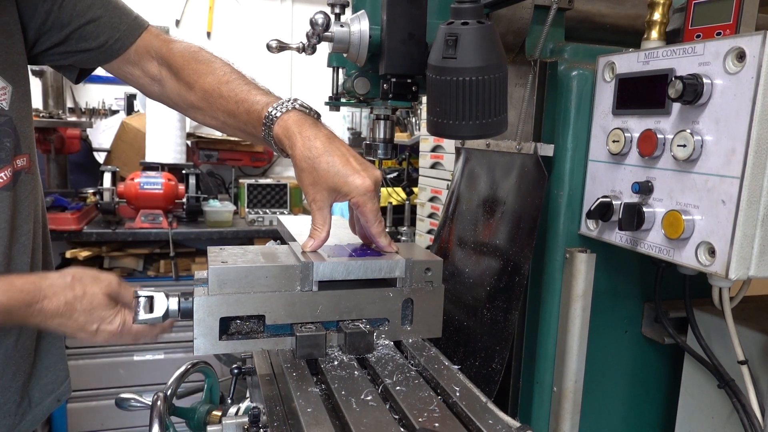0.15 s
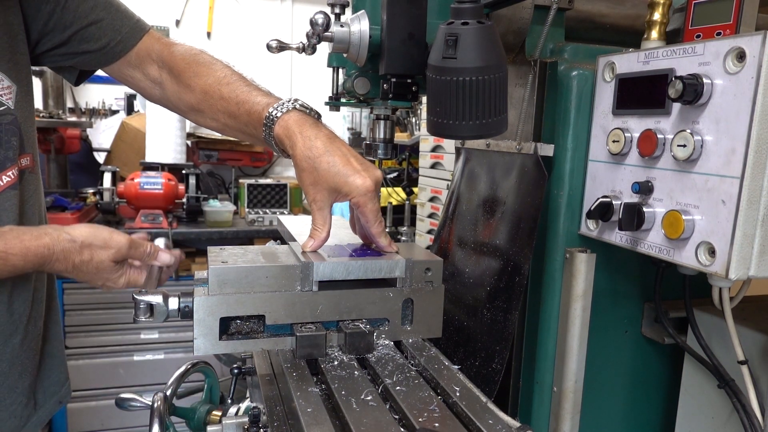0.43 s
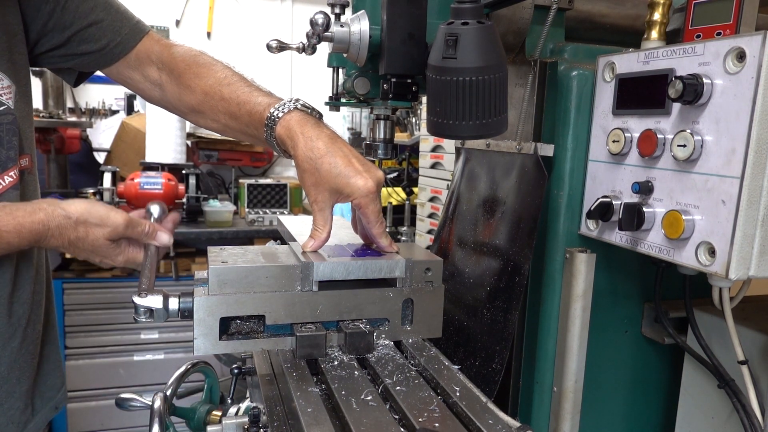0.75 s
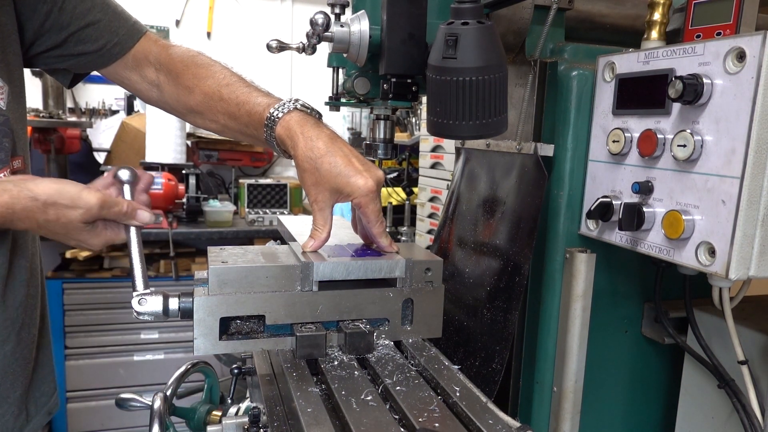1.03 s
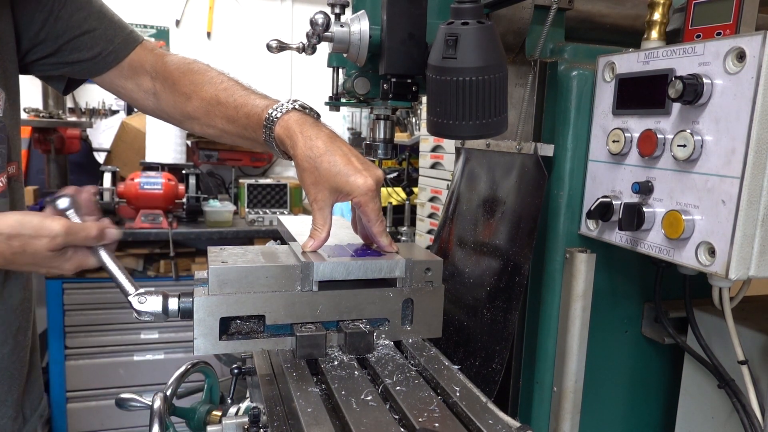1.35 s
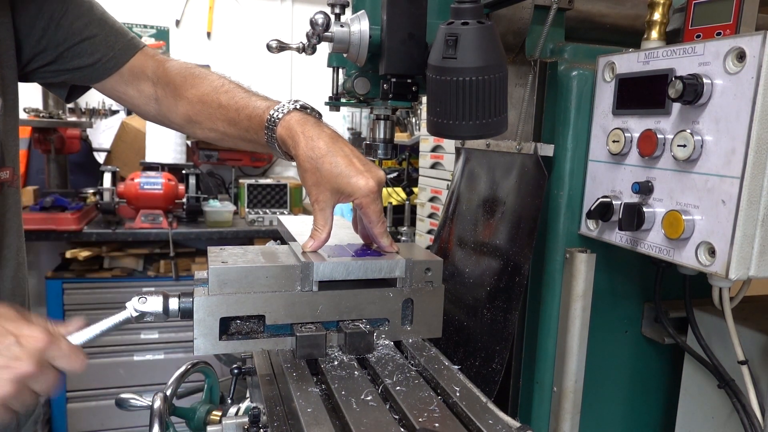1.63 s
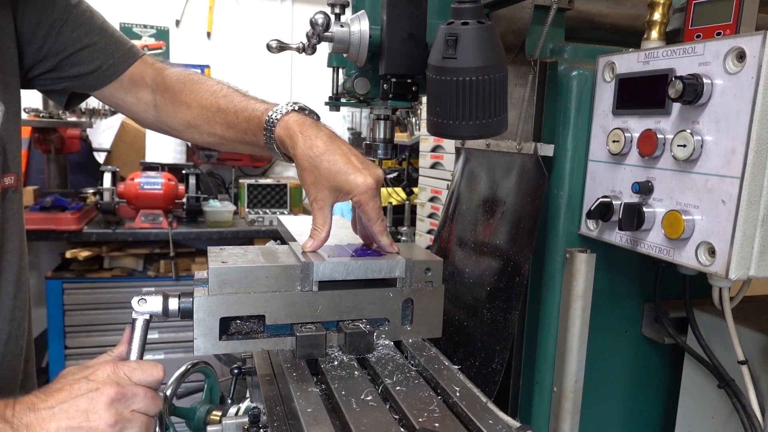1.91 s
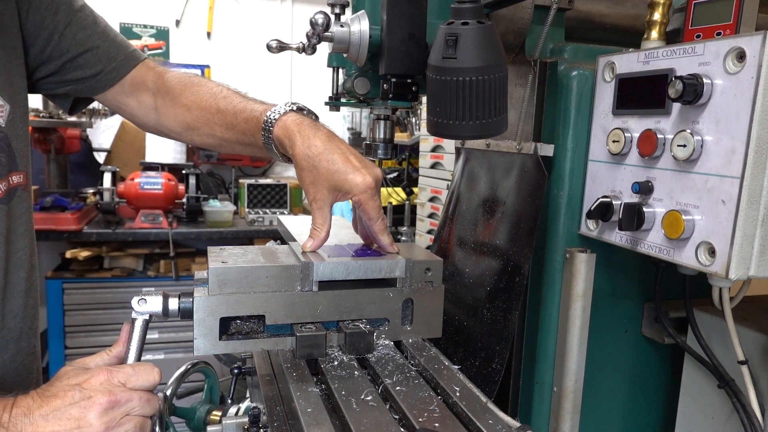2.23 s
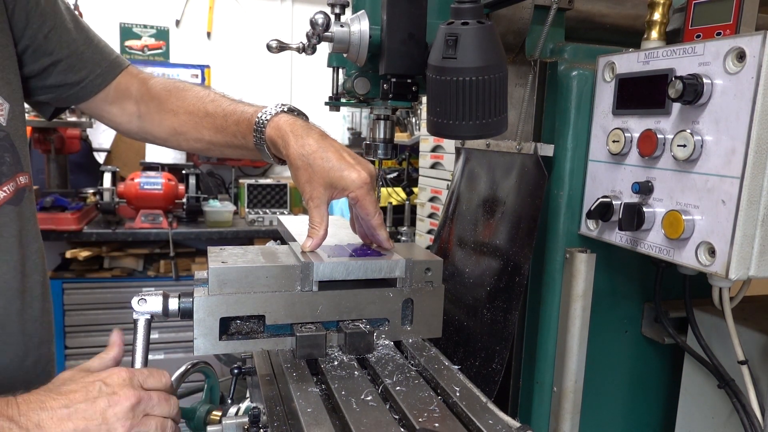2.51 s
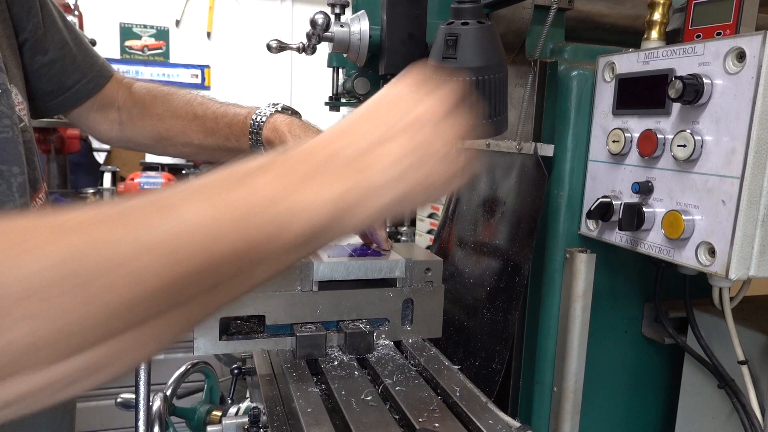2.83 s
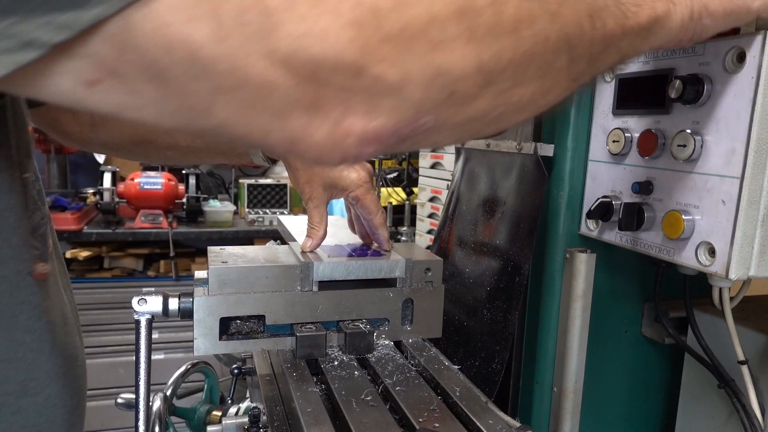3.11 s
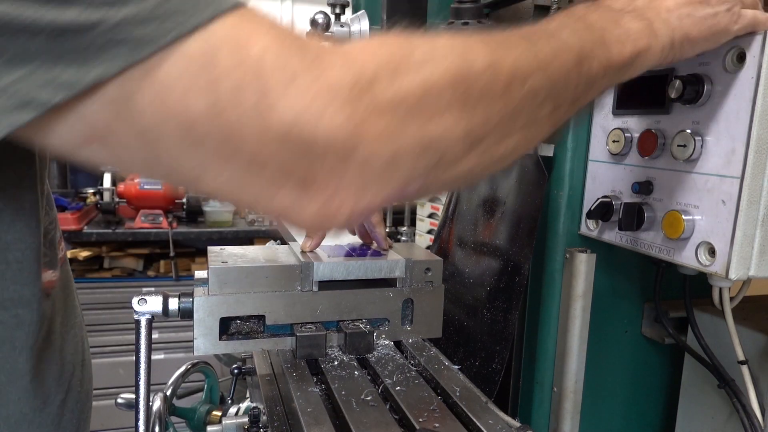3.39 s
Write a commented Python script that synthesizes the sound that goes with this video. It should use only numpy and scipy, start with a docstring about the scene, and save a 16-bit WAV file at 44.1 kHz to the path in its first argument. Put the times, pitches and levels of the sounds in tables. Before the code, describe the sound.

Steel vise handle clinks and knocks in a workshop, then a machine lever clatters and thuds

```python
"""Vise handle and lever in a home workshop

A metre or so from the microphone, a steel handle is swung round on a machine vise: it clinks in its joint
and knocks the vise. Later a latch snaps within a short slide, and a lever on the machine head clatters over
and lands with a thud. Metal is struck banks of decaying modes with noise; latch slide, sleeves and room air
are coloured noise. Mains hum is sines, the fan drone narrow noise bands; a diffuse noise echo adds the room."""
import sys
import numpy as np
from scipy import signal
from scipy.fft import rfft, irfft
from scipy.io import wavfile

SR = 44100
rng = np.random.default_rng(int(sys.argv[2]) if len(sys.argv) > 2 else 0)


def transcribe(signal):
    """Save signal, clipped to [-1, 1], as a 16-bit WAV file at the path in sys.argv[1]."""
    frames = np.atleast_2d(signal).T
    limited = np.clip(frames, -1, 1)
    pcm = np.round(limited * 32767).astype(np.int16)
    wavfile.write(sys.argv[1], SR, pcm)


N = 156555   # length in samples

# Levels of struck sounds are drives, ahead of the mode sharing and the filters.
# room air: pitch_hz [Hz], relative_level_db [dB per Hz]
AIR_COLOUR = [(13, -35), (22, 2.5), (56, -7.5), (70, -7.5), (83, -8.5), (103, -7), (125, -17), (194, -10),
              (249, -4), (319, -18), (366, -13.5), (524, -18.5), (569, -23), (710, -20), (935, -27),
              (3150, -36.5), (16000, -47)]
# sleeves: start_s [s], level_db [dB rms]
RUSTLE_LEVEL = [(0, -80), (.2, -58), (.5, -75), (.9, -56), (1.1, -59.5), (1.2, -53), (1.3, -51),
                (2.0, -65.5), (2.25, -50), (2.4, -57), (2.52, -49.5), (2.65, -55), (2.85, -53),
                (2.95, -50.5), (3.05, -57.5), (3.55, -45.5)]
# sleeves: pitch_hz [Hz], relative_level_db [dB per Hz]
RUSTLE_SPECTRUM = [(500, 11), (1200, 2), (3000, 1), (5000, -2.5), (9000, -14), (15000, -17)]
# mains hum: pitch_hz [Hz], level_db [dB rms]
MAINS_HUM = [(100, -46.5), (700, -67.5)]
# fan drone resonances: pitch_hz [Hz], width_hz [Hz], level_db [dB rms]
FAN_DRONE = [(252.6, 17.7, -48.5), (233.1, 28, -50.5), (367.7, 90, -55), (516, 55, -60)]
# handle touches: start_s [s], vise_db [dB], vise_centre_hz [Hz], ring_db [dB], ring_centre_hz [Hz], crack_db [dB]
HANDLE_TOUCHES = [(1.2, -47, 1720, -70, 5000, -45), (1.250, -24.5, 1810, -36.5, 6370, -56),
                  (1.305, -24.5, 1590, -50, 5000, -61), (1.310, -40, 1500, -29, 7500, -31),
                  (1.330, -26, 1600, -24.5, 4600, -60), (1.345, -9, 1840, -37, 6900, -26),
                  (1.345, -20, 3500, -60, 5000, -50), (1.353, -19, 377, -70, 5000, -50),
                  (1.362, -33, 1130, -56, 4540, -45), (1.398, -27.5, 1400, -47, 5000, -42),
                  (1.437, -27, 420, -65, 4950, -47), (1.478, -27.5, 510, -54, 5000, -55),
                  (1.602, -24.5, 1480, -38.5, 4960, -58), (1.623, -24.5, 930, -36, 4860, -58),
                  (1.640, -23.5, 1870, -48, 5000, -59), (1.683, -18, 2350, -37, 5000, -51),
                  (1.698, -19.5, 1700, -22, 8560, -26.5), (1.705, -13, 1640, -15, 4970, -30),
                  (1.725, -35, 1530, -36, 6000, -42), (1.742, -27, 1260, -26, 4950, -50),
                  (1.792, -20, 1670, -45, 5000, -53), (1.765, -30, 1080, -37, 5000, -55),
                  (1.825, -28.5, 870, -41, 5000, -55), (1.893, -28.5, 1480, -47, 5000, -63),
                  (1.905, -26, 373, -55, 5000, -65), (1.955, -38.5, 1180, -66, 5000, -60)]
# vise modes: pitch_hz [Hz], level_db [dB], t60_s [s]
VISE_MODES = [(355, 9.5, 0.087), (377, 3, 0.21), (564, 6, 0.047), (703, -0.5, 0.073), (811, 2, 0.07),
              (1128, -2, .12), (1199, -1, 0.1), (1363, 8, 0.023), (1428, -3.5, 0.21), (1520, 0.5, 0.049),
              (1640, -2, 0.073), (1804, -3.5, 0.058), (2024, -7, .04), (2228, 3, 0.046), (2370, -34, 0.031),
              (2780, -11, 0.014), (2970, -4, 0.013), (3664, -4.5, 0.024), (4180, -11, 0.054)]
# handle modes: pitch_hz [Hz], level_db [dB], t60_s [s]
HANDLE_MODES = [(4740, -7, .08), (4690, -7, 0.071), (4835, 3, 0.06), (4910, 1.5, 0.078), (4900, -29, .12),
                (7100, -18, 0.043), (9440, -15, 0.032), (9350, -10.5, 0.074), (9380, -10.5, .04),
                (10500, -9, 0.032), (13800, -9, 0.025), (15200, -7, .02)]
# small ticks and thumps: start_s [s], level_db [dB], pitch_hz [Hz], bandwidth_octaves [octaves], t60_s [s]
SMALL_TICKS = [(1.838, -33.5, 8800, 0.89, 0.0071), (2.481, -30, 373, 2.04, 0.027),
               (2.497, -49, 3000, 3.5, 0.034), (2.757, -30.5, 6400, 5.3, 0.0055),
               (3.065, -31, 342, 0.8, .04), (3.253, -42.5, 4800, 1.2, 0.031), (1.37, -33.5, 60, 1.8, 0.25),
               (1.44, -32, 50.3, 1.5, 0.47), (1.94, -33, 48.6, 2.2, 0.18)]
# latch modes: pitch_hz [Hz], level_db [dB], t60_s [s]
LATCH_MODES = [(1255, -3, 0.01), (1990, -0.5, 0.015), (2360, -6.5, 0.015), (3430, -23, 0.023),
               (4400, -11, 0.016), (6900, -30, .012), (10600, -12.5, 0.0057), (14900, -23, .006)]
# slide around the snap: start_s [s], level_db [dB rms]
SLIDE_LEVEL = [(3.088, -39), (3.1, -31.5), (3.109, -32), (3.145, -34.5), (3.21, -51), (3.25, -57)]
# slide: pitch_hz [Hz], relative_level_db [dB per Hz]
SLIDE_SPECTRUM = [(290, -52), (500, -29), (668, -10), (773, -28), (1180, -6.5), (2430, -2.5), (3340, -6.5),
                  (4150, -7), (9360, -16), (16000, -27)]
# lever blows: start_s [s], level_db [dB], centre_hz [Hz], thud_db [dB], crack_db [dB]
LEVER_BLOWS = [(3.295, -18, 1130, -43, -52), (3.296, -15.5, 504, -46, -60), (3.322, -13, 560, -50, -36),
               (3.333, -12, 1260, -50, -36), (3.340, -2, 1290, -29, -26), (3.342, -1, 710, -40, -44),
               (3.350, -2, 750, -38, -36), (3.352, -5.5, 1750, -43, -37), (3.368, -11, 400, -35, -26),
               (3.371, -2, 1900, -50, -28), (3.372, -14.5, 4500, -50, -40), (3.379, -4, 1020, -42, -22),
               (3.394, -1, 564, -14.5, -13.5), (3.396, 3.5, 1770, -49, -25), (3.395, -10.5, 4200, -50, -44),
               (3.404, -7.5, 2640, -43, -32), (3.412, -10, 700, -26, -22), (3.424, -5.5, 990, -44, -24),
               (3.434, -0.5, 1580, -17, -18.5), (3.437, -2.5, 4260, -31, -28),
               (3.441, -23, 900, -12.5, -28), (3.456, -27, 1920, -32, -30), (3.475, -31, 1720, -50, -34),
               (3.505, -30, 2200, -40, -43), (3.531, -31, 2220, -38, -51)]
# lever and machine head modes: pitch_hz [Hz], level_db [dB], t60_s [s]
HEAD_MODES = [(375, 2, 0.22), (485, 8, .035), (660, -2, 0.017), (716, 5, 0.04), (948, 2, 0.027),
              (1026, 2, 0.039), (1124, -3, 0.015), (1296, 5, 0.03), (1360, 1.5, 0.029), (1558, 3, 0.042),
              (1730, 3, 0.041), (1907, 1.5, 0.028), (2094, -0.5, 0.018), (2200, -3, 0.022),
              (2570, 4, 0.017), (2950, 1, 0.023), (3270, 3, 0.022), (4020, -8, 0.032), (4160, 3.5, 0.021),
              (4870, -6, .025)]
# thud of the column: pitch_hz [Hz], level_db [dB], t60_s [s]
COLUMN_MODES = [(70, -18, 0.6), (152.4, -3.5, 0.2), (212, 0.5, 0.048)]
# echo decay of the room: pitch_hz [Hz], t60_s [s]
ROOM_DECAY = [(300, 0.43), (600, 0.35), (1500, 0.35), (4000, 0.28), (9000, 0.2), (14000, 0.19)]

AIR_DB = -43   # rms
# loss one octave away from the centre of a blow
VISE_FALL_DB, HANDLE_FALL_DB, HEAD_FALL_DB = 4.5, 8.5, 17.5
MODE_SCATTER_DB = 2   # standard deviation from blow to blow
CRACK_T60_S, CRACK_LOW_HZ, CRACK_HIGH_HZ = 0.017, 1390, 9000
CHATTER_PER_S, CHATTER_T60_S = 900, 0.11   # small rattles that follow each blow
SNAP_S, SNAP_DB = 3.098, -14
SLIDE_START_S = 3.088
ROOM_DB, THUD_ROOM_SHARE = -8.5, 0.33   # echo level; gain of the thud into the echo
CUTOFF_HZ = 15900


def amp(db):
    """Decibels to gain."""
    return 10 ** (np.asarray(db, float) / 20)


def in_time(rows):
    """Values joined by straight lines in time."""
    s, values = np.transpose(rows)
    return np.interp(np.arange(N) / SR, s, values)


def at_hz(points, hz):
    """Table read on a log-frequency axis."""
    table_hz, values = np.transpose(points)
    return np.interp(np.log(np.maximum(hz, 1)), np.log(table_hz), values)


def coloured(spectrum):
    """Noise with the given spectrum, rms 1."""
    gains = amp(at_hz(spectrum, np.fft.rfftfreq(N + 1, 1 / SR)))
    noise = irfft(rfft(rng.standard_normal(N + 1)) * gains, N + 1)[:N]
    return noise / np.std(noise)


def clicks(s, gains):
    """Impulses at the given times."""
    out = np.full(N, 1e-18)   # inaudible floor keeps filter states off zero
    np.add.at(out, (np.asarray(s) * SR).astype(int), gains)
    return out


def ring(x, hz, t60):
    """A two-pole resonator: a unit click sets a decaying sine of starting height 1 ringing."""
    radius = amp(-60 / (max(t60, .003) * SR))
    angle = 2 * np.pi * hz / SR
    return signal.lfilter([0, np.sin(angle)], [1, -2 * radius * np.cos(angle), radius * radius], x)


def dying(x, t60):
    """Each click becomes an exponentially decaying envelope."""
    return signal.lfilter([1], [1, -amp(-60 / (max(t60, .002) * SR))], x)


def band(x, low_hz, high_hz):
    """Butterworth band-pass."""
    edges = [max(low_hz, 10), min(high_hz, .45 * SR)]
    return signal.sosfilt(signal.butter(2, edges, "band", fs=SR, output="sos"), x)


def struck(s, db, modes, centre_hz, fall_db, chatter_db, body_db, body_t60):
    """Blows and rattles drive every mode, strongest near each blow's centre; noise stands for dense small modes."""
    scatter = rng.standard_normal((len(s), len(modes)))
    rattle_on = rng.random((2, N)) < CHATTER_PER_S / SR
    rattle = rng.standard_normal((2, N)) * rattle_on * amp(chatter_db)
    grain = rng.standard_normal((2, N))
    out = 0
    for k, (hz, mode_db, t60) in enumerate(modes):
        level = db + mode_db - fall_db * np.log2(hz / centre_hz) ** 2
        hits = clicks(s, amp(level + MODE_SCATTER_DB * scatter[:, k]))
        chatter = rattle[k % 2] * dying(hits, CHATTER_T60_S)
        tone = ring(hits + chatter, hz, t60)
        # a narrower low band passes less noise, so its body is raised
        body_gain = amp(body_db) * np.sqrt(SR / (hz + 600) / 2)
        body = body_gain * grain[k % 2] * dying(hits, body_t60)
        out = out + band(tone + body, hz / 1.25, hz * 1.25)
    return out / np.sqrt(len(modes))


def cracks(s, db):
    """Short bright noise bursts where metal meets metal."""
    bursts = rng.standard_normal(N) * dying(clicks(s, amp(db)), CRACK_T60_S)
    return band(bursts, CRACK_LOW_HZ, CRACK_HIGH_HZ)


def room_air():
    """Steady noise of the workshop air."""
    return amp(AIR_DB) * coloured(AIR_COLOUR)


def sleeves():
    """Faint cloth rustle: coloured noise swelling and sinking."""
    return amp(in_time(RUSTLE_LEVEL)) * coloured(RUSTLE_SPECTRUM)


def mains_hum():
    """Steady sines at multiples of the mains frequency."""
    t = np.arange(N) / SR
    return sum(np.sqrt(2) * amp(db) * np.sin(2 * np.pi * hz * t) for hz, db in MAINS_HUM)


def fan_drone():
    """Narrow noise bands stand for the fan's resonances."""
    out = 0
    for hz, width, db in FAN_DRONE:
        # the first second is dropped while the filter settles
        tone = band(rng.standard_normal(N + SR), hz - width / 2, hz + width / 2)[SR:]
        out = out + amp(db) * tone / np.std(tone)
    return out


def handle():
    """Each touch knocks the vise, rings the handle and cracks at the contact."""
    s, vise_db, vise_hz, ring_db, ring_hz, crack_db = np.transpose(HANDLE_TOUCHES)
    knock = struck(s, vise_db, VISE_MODES, vise_hz, VISE_FALL_DB,
                   chatter_db=-12.5, body_db=-12, body_t60=0.17)
    clink = struck(s, ring_db, HANDLE_MODES, ring_hz, HANDLE_FALL_DB,
                   chatter_db=-8, body_db=-21, body_t60=.08)
    return knock + clink + cracks(s, crack_db)


def ticks():
    """Small ticks and thumps: decaying noise puffs, each in its own band."""
    out = 0
    for s, db, hz, octaves, t60 in SMALL_TICKS:
        puff = rng.standard_normal(N) * dying(clicks([s], amp(db)), t60)
        puff = puff * np.sqrt(SR / 4 / hz)   # low puffs are raised
        out = out + band(puff, hz / 2 ** (octaves / 2), hz * 2 ** (octaves / 2))
    return out


def latch_slide():
    """Coloured noise of the latch sliding, from just before the snap to just after it."""
    t = np.arange(N) / SR
    sliding = (t > SLIDE_START_S) * (t < SLIDE_LEVEL[-1][0])
    return amp(in_time(SLIDE_LEVEL)) * coloured(SLIDE_SPECTRUM) * sliding


def latch_snap():
    """One click sets all the latch modes ringing, a short snap."""
    return sum(ring(clicks([SNAP_S], amp(SNAP_DB + db)), hz, t60) for hz, db, t60 in LATCH_MODES)


def lever():
    """Blows clatter through the head modes and thud in the column; returns clatter and thud."""
    s, db, hz, thud_db, crack_db = np.transpose(LEVER_BLOWS)
    clatter = struck(s, db, HEAD_MODES, hz, HEAD_FALL_DB,
                     chatter_db=-21.5, body_db=-20.5, body_t60=0.23)
    thud = 0
    for mode_hz, mode_db, t60 in COLUMN_MODES:
        tone = ring(clicks(s, amp(thud_db)), mode_hz, t60)
        thud = thud + amp(mode_db) * band(tone, mode_hz / 1.37, mode_hz * 1.25)
    return clatter + cracks(s, crack_db), thud


def workshop(x):
    """Diffuse echo: half a second of noise that dies at its own rate in each band."""
    t = np.arange(SR // 2) / SR
    tail = 0
    for hz, t60 in ROOM_DECAY:
        tail = tail + band(rng.standard_normal(len(t)), hz / 1.7, hz * 1.7) * amp(-60 * t / t60)
    tail = tail * np.clip(t / .012, 0, 1)   # the echo builds up over 12 ms
    return signal.fftconvolve(x, tail / np.sqrt(np.sum(tail ** 2)))[:N]


def scene():
    """Direct metal sounds and their workshop echo over the slide, sleeves and room bed."""
    bed = room_air() + sleeves() + mains_hum() + fan_drone()
    clatter, thud = lever()
    direct = handle() + ticks() + latch_snap() + clatter
    echo = amp(ROOM_DB) * workshop(direct + THUD_ROOM_SHARE * thud)
    return (direct + thud + echo + latch_slide() + bed)[None]


def record(sound):
    """A steep low-pass cuts the top, 60 dB down just above the cutoff."""
    return signal.sosfilt(signal.cheby2(12, 60, CUTOFF_HZ * 1.04, fs=SR, output="sos"), sound)


dry = scene()
out = record(dry)
transcribe(out)
```